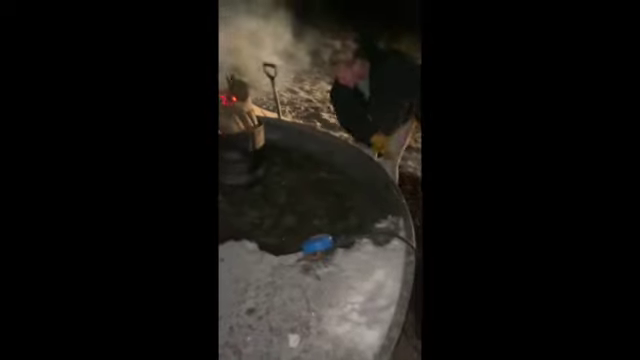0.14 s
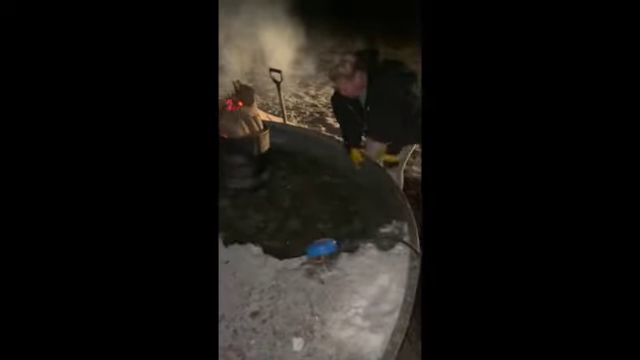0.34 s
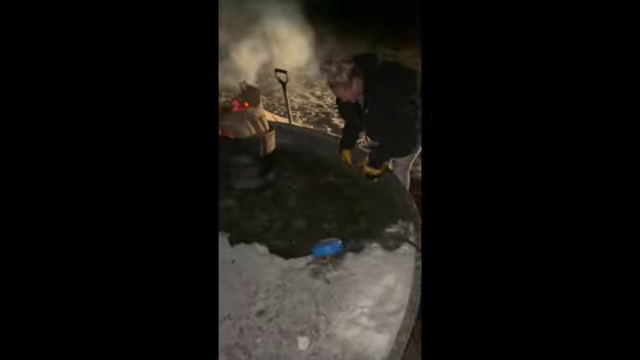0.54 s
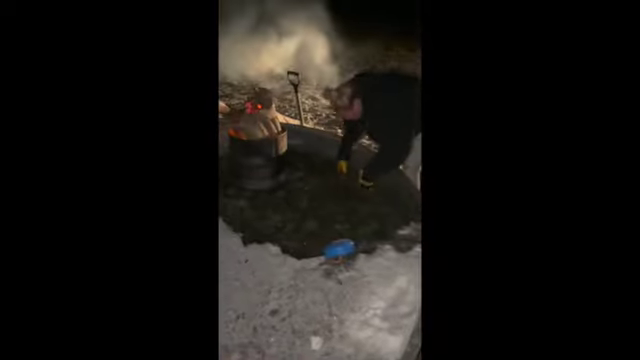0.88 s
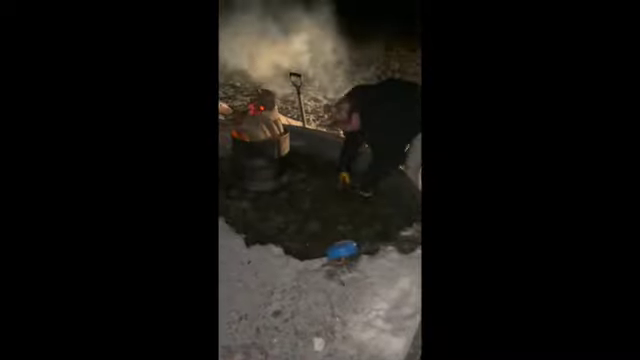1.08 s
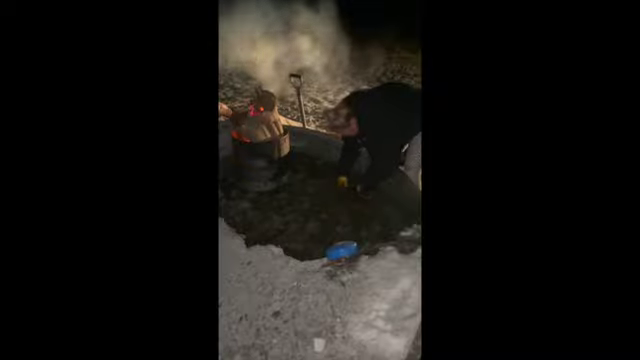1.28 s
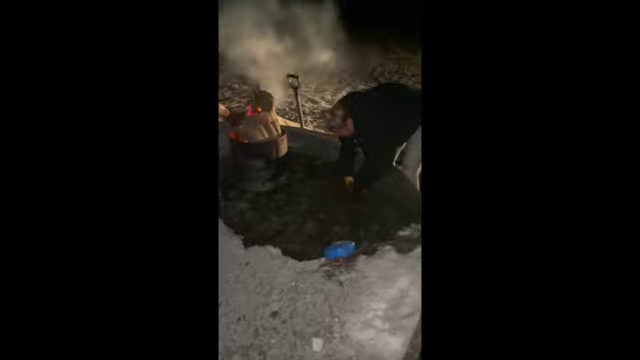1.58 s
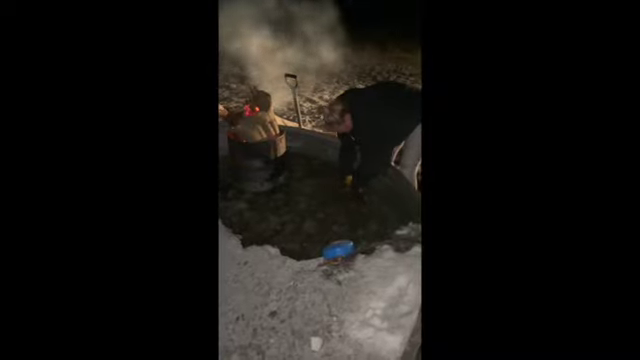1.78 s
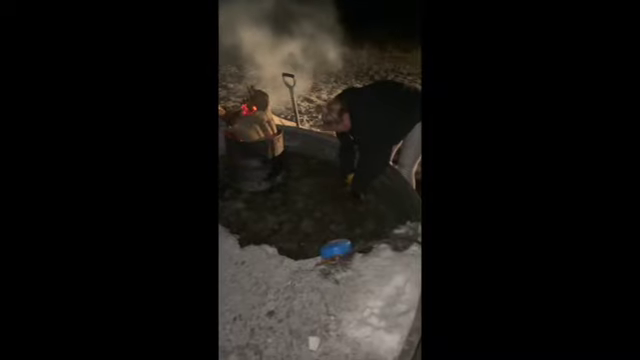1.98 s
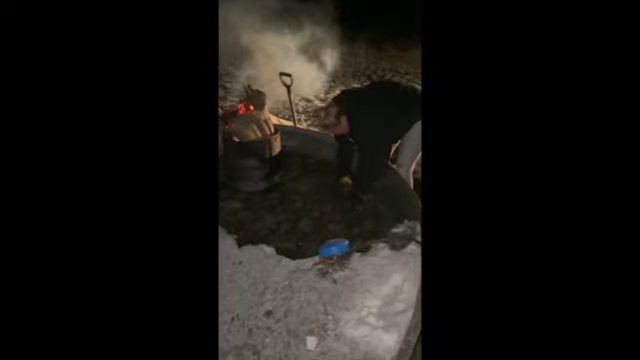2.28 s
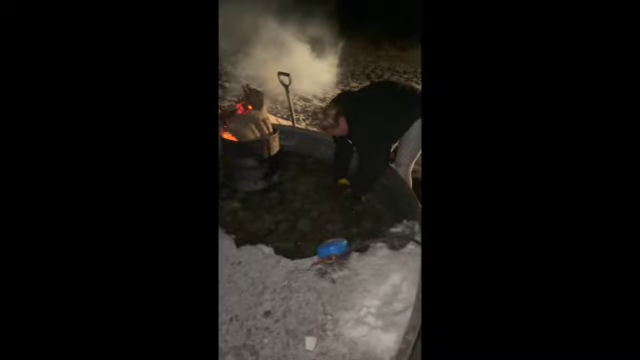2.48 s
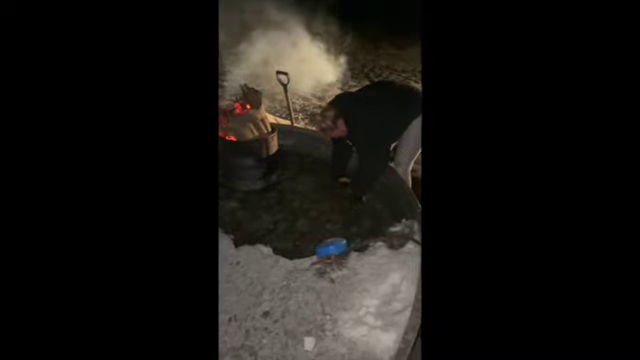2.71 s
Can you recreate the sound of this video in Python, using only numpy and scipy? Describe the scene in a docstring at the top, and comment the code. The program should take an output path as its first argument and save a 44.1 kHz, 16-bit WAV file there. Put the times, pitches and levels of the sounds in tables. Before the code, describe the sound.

Ice cracks and crunches close by from about 0.3 to 0.6 seconds, with sharp snaps and one hollow knock. From 1 second, floating chunks bump a little farther off while water sloshes, glugs and drips in the tank. The surges are strongest near 1.5 and 2 seconds, the second with another snap, and a smaller one follows at 2.5. A low outdoor rumble and faint hiss continue throughout.

```python
"""Broken ice is worked loose in a water-filled stock tank, outdoors at night.
First, close by, ice cracks and crunches in bursts of tiny fractures, with one hollow knock at 0.35 s.
From 1 s, floating chunks bump and ring farther off. The water sloshes in a few surges:
trapped air glugs, drops leave ringing bubbles. A low rumble and a faint hiss lie under it all."""
import sys
import numpy as np
from scipy import signal
from scipy.fft import rfft, irfft, next_fast_len
from scipy.io import wavfile

SR = 44100
rng = np.random.default_rng(int(sys.argv[2]) if len(sys.argv) > 2 else 0)


def transcribe(u):
    """Save the signal u as a 16-bit wav file named by the first command-line argument.

    u: samples, shape (n,) or (channels, n), limited to [-1, 1]; the rate is SR.
    q: integer samples, one column per channel.
    """
    v = np.clip(np.atleast_2d(u).T, -1, 1)
    q = np.round(v * 32767).astype(np.int16)
    wavfile.write(sys.argv[1], SR, q)


N = 125685
T = np.arange(N) / SR
FFT_SIZE = next_fast_len(N + 8192)
HZ = np.maximum(np.fft.rfftfreq(FFT_SIZE, 1 / SR), 1)

# Levels are relative gains, ahead of stereo spread and microphone.
CRACKS = [(.029, 0.0037, -71, -44, -51), (.0638, 0.0018, -65, -45, -32), (.2957, 0.0027, -28, -36, -14.5),
          (.3155, 0.0013, -33.5, -39, -14.5), (.3295, 0.0023, -47, -19, -20),
          (.3342, 0.0015, -27, -29, -15.5), (.3541, 0.0021, -19, -21.5, -16.5),
          (.365, 0.0058, -36, -29, -32), (.3765, .001, -48, -44, -33), (.3908, 0.0028, -55, -60, -24),
          (.4055, 0.0052, -34, -26, -20.5), (.4235, 0.0055, -58, -61, -26), (.4497, 0.0017, -32, -30, -39),
          (.4617, 0.0021, -30, -26, -33), (.482, .003, -58, -44, -30), (.499, 0.0039, -41, -48, -30),
          (.5248, 0.0012, -28.5, -53, -16), (.537, 0.0019, -46, -53, -33), (.576, 0.0055, -44, -44, -46.5),
          (.634, 0.01, -66, -48, -38), (.6759, 0.014, -42.5, -51, -46), (.7422, 0.0023, -60, -71, -39.5),
          (.856, 0.0046, -45, -45.5, -50), (.8709, 0.0018, -42, -40, -40), (.8969, 0.0046, -69, -62, -41),
          (.9283, .005, -72, -69, -42.5), (1.0925, 0.0013, -53, -40, -28.5),
          (1.3465, 0.0013, -35.5, -39, -37), (1.9612, 0.0009, -15, -39, -45),
          (2.155, 0.0017, -48, -41, -39.5), (2.248, 0.0016, -64, -61, -40), (2.75, 0.0042, -67, -51, -41.5)]  # close ice cracking: t/s, decay/s, bass/dB, middle/dB, treble/dB
ICE_MODES = [(2330, -49, 0.057), (2570, -36.5, 0.04), (3000, -37, 0.042), (5670, -45, 0.06),
             (12100, -28, 0.025)]  # ring of close ice: f/Hz, level/dB, t60/s
CRUNCH_ENVELOPE = [(0, -54.5), (.285, -63), (.3, -34.5), (.345, -42), (.37, -41), (.42, -41.5), (.46, -41),
                   (.52, -45), (.6, -61), (.66, -46), (.75, -87), (.87, -60), (1, -83), (2.85, -65)]  # crumbling ice: t/s, level/dB
CRUNCH_SPECTRUM = [(650, -2.5), (1100, -9), (2000, -7.5), (2800, -2), (4000, 1), (7000, -4), (10000, -23),
                   (12500, -7.5), (16000, 3.5)]  # crumbling ice: f/Hz, level/dB
CLINKS = [(0.2964, 6180, -31, 0.0025), (0.296, 6840, -22.5, .003), (0.2975, 1196, -20.5, 0.0042),
          (0.2991, 2950, -28, 0.0091), (0.33, 1560, -21, 0.0033), (0.334, 5820, -20.5, 0.0045),
          (0.333, 2440, -15.5, 0.002), (0.3913, 12400, -29, .005), (0.4057, 7850, -13.5, 0.0029),
          (0.4066, 980, -28, 0.0044), (0.405, 1607, -24, 0.004), (0.427, 2720, -38, 0.017),
          (0.4498, 2840, -19, 0.0019), (0.461, 3000, -37, 0.0053), (0.524, 7200, -27, 0.0033),
          (0.5255, 1004, -29.5, 0.0054), (.576, 958, -36, 0.0063), (.578, 3000, -47, 0.0084),
          (0.7428, 12640, -33, 0.002)]  # ringing shards: t/s, f/Hz, peak/dB, decay/s
SNAPS = [(0.061, -38), (0.3149, -9), (.3345, -15), (0.3552, -8), (0.391, -15), (.407, -15), (0.462, -16),
         (0.5248, -6.5), (0.8712, -29.5), (1.0925, -27), (1.3472, -23.5), (1.435, -25), (1.504, -32),
         (1.9615, -20)]  # brittle breaks: t/s, level/dB
SNAP_SPECTRUM = [(1500, -22), (4000, -4), (7000, 3), (12500, -2), (16000, 2)]  # brittle breaks: f/Hz, level/dB
BUMPS = [(1.0467, 0.021, -48.5, -44, -52), (1.1096, 0.019, -65, -40.5, -47), (1.2153, 0.031, -59, -46, -48),
         (1.252, 0.0046, -42.5, -46, -41), (1.3695, 0.0079, -35.5, -42, -40.5),
         (1.4348, 0.0031, -28, -27, -37), (1.4588, 0.0025, -35, -50, -37), (1.504, 0.0026, -28, -24.5, -35),
         (1.5266, 0.0047, -30, -25.5, -30), (1.5496, 0.005, -33.5, -36, -37),
         (1.6718, 0.015, -55, -39, -53), (1.7362, 0.0083, -40, -46, -64), (1.8055, 0.0041, -36.5, -54, -63),
         (1.8594, 0.0036, -50, -43, -59), (1.9377, 0.0092, -28, -30.5, -55),
         (1.9615, 0.0046, -23, -29.5, -43), (2.046, 0.0064, -42, -37, -48),
         (2.3203, 0.0031, -38.5, -37.5, -43), (2.4186, 0.0055, -39.5, -42, -57),
         (2.449, 0.0058, -36, -40.5, -46), (2.551, 0.029, -56, -45.5, -62)]  # chunks colliding: t/s, decay/s, bass/dB, middle/dB, treble/dB
CHUNK_MODES = [(335, -24.5, 0.09), (770, -40.5, 0.18), (964, -36.5, 0.12), (1253, -29.5, 0.056),
               (2230, -26, 0.0091), (3360, -40.5, 0.02)]  # ring of floating chunks: f/Hz, level/dB, t60/s

SLOSH_ENVELOPE = [(0, -77), (.93, -59), (1.02, -75), (1.08, -47), (1.17, -65), (1.24, -42.5), (1.32, -52),
                  (1.46, -38), (1.57, -37.5), (1.7, -41), (1.78, -45.5), (1.9, -40), (1.98, -40),
                  (2.08, -40), (2.2, -61), (2.32, -44.5), (2.39, -51), (2.5, -41), (2.64, -52), (2.73, -45),
                  (2.85, -71)]  # water surges: t/s, level/dB
SLOSH_SPECTRUM = [(180, 8.5), (320, 10), (480, 1), (800, -1.5), (1300, -11), (2200, -13.5), (3500, -19.5),
                  (5000, -46), (7000, -48), (15000, -30)]  # bubbles and wash: f/Hz, level/dB
SPRAY_ENVELOPE = [(0, -83), (1.0, -62.5), (1.25, -55), (1.42, -51), (1.54, -39.5), (1.66, -47.5),
                  (1.8, -61.5), (1.9, -49.5), (1.97, -46), (2.1, -51), (2.22, -55), (2.5, -54), (2.68, -52),
                  (2.85, -54)]  # droplet fizz: t/s, level/dB
SPRAY_SPECTRUM = [(1500, -35), (3300, 8), (5000, 4.5), (7000, -0.5), (10000, -18), (13000, 0.5), (16000, 6)]  # droplet fizz: f/Hz, level/dB
GLUGS = [(.297, 385, -31, 0.0043), (.3537, 720, -8, 0.0015), (.355, 894, -11.5, 0.00082),
         (.3535, 248, -17.5, 0.0014), (1.238, 335, -34, 0.0086), (1.372, 340, -23.5, 0.0079),
         (1.434, 928, -30, 0.0085), (1.465, 305, -22.5, 0.0045), (1.524, 335, -28.5, 0.0079),
         (1.558, 307, -18.5, 0.008), (1.603, 345, -35, 0.0055), (1.812, 335, -33.5, 0.0073),
         (1.9612, 280, -26, .004), (2.049, 319, -31, 0.0075), (2.498, 347, -28, 0.0042),
         (2.526, 304, -28, 0.0083), (2.712, 343, -39, 0.0052)]  # hollow ice knocks and trapped air: t/s, f/Hz, peak/dB, swell/s
THUDS = [(.205, 150, -51, 0.0086), (.45, 69.3, -33, 0.058), (.545, 79, -21.5, 0.013),
         (.68, 55, -33.5, 0.014), (.92, 51, -45, .018), (1.075, 133, -28.5, 0.0056),
         (1.465, 174, -35.5, 0.0092), (1.55, 134, -31.5, 0.017), (1.607, 165, -23.5, 0.0037),
         (1.8, 60.6, -31.5, 0.0062), (1.921, 85, -27, 0.005), (1.958, 112, -29.5, 0.016),
         (1.985, 204, -31.5, 0.0085), (2.525, 154, -35, 0.013)]  # heaving water: t/s, f/Hz, peak/dB, swell/s
WAVES = [(1.425, -44, .016), (1.524, -38, 0.043), (1.956, -32.5, 0.022), (2.03, -39, 0.0093),
         (2.299, -42, 0.012), (2.467, -38.5, 0.014), (2.53, -44, .025)]  # waves along the wall: t/s, peak/dB, swell/s
WAVE_SPECTRUM = [(220, 0.5), (400, -3), (550, -2.5), (850, 2), (1400, -11), (3000, -24), (5000, -35)]  # wave wash: f/Hz, level/dB
DRIPS = [(.112, 1830, -48, 0.0026), (.215, 1774, -51, 0.0089), (1.045, 1875, -38, 0.0027),
         (1.046, 1174, -35.5, 0.0011), (1.111, 1416, -42, 0.0052), (1.214, 1270, -43.5, 0.0068),
         (1.372, 765, -31.5, .005), (1.434, 3520, -33, 0.0014), (1.469, 3350, -33.5, 0.0012),
         (1.502, 1900, -33, 0.0041), (1.591, 3380, -39, 0.002), (1.597, 2270, -37, 0.002),
         (1.671, 3660, -39, .0015), (1.733, 2270, -36.5, 0.0022), (1.806, 795, -47, 0.0021),
         (1.808, 460, -35, 0.0047), (1.9605, 1300, -21, 0.0018), (1.9605, 1790, -28, 0.0018),
         (2.045, 2310, -40, 0.0033), (2.172, 2750, -46, 0.0033), (2.318, 2110, -40.5, 0.0022),
         (2.365, 1270, -40.5, 0.0029), (2.417, 1464, -45, 0.0053), (2.474, 830, -40, 0.0049),
         (2.502, 500, -32, 0.0035), (2.645, 3550, -44, .002), (2.67, 3400, -43, 0.0017),
         (2.702, 1990, -47, 0.0036)]  # single drips: t/s, f/Hz, peak/dB, swell/s
TRICKLE_ENVELOPE = [(0, -62), (.3, -62), (.7, -80), (1.0, -60), (1.3, -57), (1.6, -49), (1.8, -55.5),
                    (2.05, -54.5), (2.25, -53), (2.6, -52), (2.85, -55)]  # run-off from the ice: t/s, level/dB
DROP_SPECTRUM = [(900, -0.5), (2000, 12), (3300, 12), (4500, 3), (7000, -30)]  # run-off drop strength by pitch: f/Hz, level/dB

RUMBLE_ENVELOPE = [(0, -41.5), (.25, -38.5), (.55, -38.5), (.75, -40.5), (1.3, -37.5), (1.75, -40.5),
                   (1.98, -33), (2.2, -41.5), (2.55, -37.5), (2.85, -40.5)]  # outdoor rumble: t/s, level/dB
RUMBLE_SPECTRUM = [(25, -19), (45, -7), (70, -4.5), (125, 1), (170, -6), (240, -9.5), (310, -12.5),
                   (420, -29.5), (700, -28)]  # outdoor rumble: f/Hz, level/dB
HISS_ENVELOPE = [(0, -59), (.2, -57.5), (.6, -55.5), (.76, -57), (.97, -56.5), (1.3, -53), (2.2, -55),
                 (2.85, -56.5)]  # faint hiss: t/s, level/dB
HISS_SPECTRUM = [(400, -6), (1000, 5), (2000, -4), (3200, -8.5), (5000, -9.5), (6500, -8), (8000, -8),
                 (10000, -33), (12500, -11), (16000, -21)]  # faint hiss: f/Hz, level/dB

STEREO_WIDTH = [(60, -46), (140, -26), (270, -14.5), (500, -7), (1200, -13), (2500, -5), (6000, -3),
                (9000, -22), (11000, -15.5), (15000, -6)]  # side against mid: f/Hz, level/dB
PORT_BALANCE = [(200, -0.5), (350, -2.5), (700, 2.5), (1250, 0.5), (2300, -6.5), (2900, 3.5), (3700, -4),
                (5300, 0.5), (6500, -0.5)]  # microphone ports, left minus right: f/Hz, level/dB
PORT_PHASE = [(200, 0), (750, -0.9), (1500, -0.47), (2600, 0.81), (3300, 0.33), (4000, 0.5), (5600, 0),
              (7400, 1.57), (8500, 2.5), (11500, 3.5), (13900, 6.5), (16500, 3)]  # lead of the left port: f/Hz, phase/rad
MIC_RESPONSE = [(100, -0.5), (3300, -2), (4700, -7), (5500, -1.5), (7300, -3), (9300, 1), (10500, 0),
                (12300, 2), (16000, -11)]  # microphone colour: f/Hz, level/dB


def cracks():
    """Close ice fractures: sharp attack, bright ring."""
    return contacts(CRACKS, ICE_MODES, edges_hz=[850, 1500, 4000, 15000], decay_scales=[1.34, 1, 0.93],
                    rise_s=0.0001, tail_db=-27, tail_s=0.011, direct_db=0, grit_db=5.5)


def crunch(t60_cycles=6, splinter_db=-4.5):
    """Crumbling ice: dense clicks plus briefly ringing splinters."""
    crumbs = stereo(colour(grains(per_s=3500, spread_db=6), CRUNCH_SPECTRUM))
    clicks = grains(per_s=1500, spread_db=3.5)
    rings = scatter_rings(clicks, np.geomspace(1100, 7500, 24), t60_cycles)
    splinters = stereo(rms_one(sum(tone for _, tone in rings)))
    return level(CRUNCH_ENVELOPE) * (crumbs + from_db(splinter_db) * splinters)


def snaps(decay_s=0.001):
    """Ice gives way at once: short, bright noise ticks."""
    bursts = sum(from_db(db) * (T >= s) * np.exp(-np.maximum(T - s, 0) / decay_s) for s, db in SNAPS)
    return stereo(bursts * noise(SNAP_SPECTRUM) / 2)


def clinks():
    """Shards ring as they snap: one damped sine each."""
    out = np.zeros(N)
    for start_s, hz, db, decay_s in CLINKS:
        t = np.maximum(T - start_s, 0)
        out += from_db(db) * np.exp(-t / decay_s) * np.sin(2 * np.pi * hz * t)
    return out


def floating_chunks():
    """Chunks collide in the tank: softer attack, lower and longer ring."""
    return contacts(BUMPS, CHUNK_MODES, edges_hz=[380, 1250, 4000, 15500], decay_scales=[1.25, 1, 1],
                    rise_s=0.00031, tail_db=-22, tail_s=0.02, direct_db=-1, grit_db=2.5)


def contacts(rows, modes, edges_hz, decay_scales, rise_s, tail_db, tail_s, direct_db, grit_db):
    """Bursts of tiny fractures in three bands, with a weak scattered tail, ring the ice modes."""
    forces = np.zeros((3, N))
    scales = np.array(decay_scales)[:, None]
    for start_s, decay_s, *band_db in rows:
        t = np.maximum(T - start_s, 0)
        attack = 1 - np.exp(-t / rise_s)
        body = np.exp(-t / (decay_s * scales)) / np.sqrt(scales)
        tail = from_db(tail_db) * np.exp(-t / tail_s)
        forces += from_db(band_db)[:, None] * attack * (body + tail)
    direct = np.zeros((2, N))
    for force, low_hz, high_hz in zip(forces, edges_hz, edges_hz[1:]):
        band = signal.butter(2, [low_hz, high_hz], "band", fs=SR, output="sos")
        fractures = rms_one(rng.standard_normal((2, N)) * from_db(grit_db * rng.standard_normal(N)))
        makeup_gain = np.sqrt(SR / 2 / (high_hz - low_hz))
        direct += makeup_gain * signal.sosfilt(band, force * fractures)
    ringing = sum(from_db(db) * ring(direct, hz, t60_s) for hz, db, t60_s in modes)
    return stereo(from_db(direct_db) * direct + ringing / 2)


def glugs():
    """Hollow ice knocks and glugs of trapped air: slightly rising tones."""
    return pan(pulses(GLUGS, rise_per_s=0.76), left_db=-1)


def slosh(t60_cycles=16, bubble_db=-2, wash_db=-1.5):
    """Surging water: ringing bubbles in a wash of clicks."""
    clicks = grains(per_s=590, spread_db=2.5)
    rings = scatter_rings(clicks, np.geomspace(280, 4500, 30), t60_cycles)
    bubbles = rms_one(sum(tone * hz * from_db(at_hz(SLOSH_SPECTRUM, hz)) for hz, tone in rings))
    wash = colour(grains(per_s=5000, spread_db=3.5), SLOSH_SPECTRUM)
    surge = level(SLOSH_ENVELOPE) * spurts(per_s=180, depth_db=0.5)
    return surge * (from_db(bubble_db) * bubbles + from_db(wash_db) * wash)


def spray():
    """Droplets fizz: dense bright clicks in spurts."""
    envelope = level(SPRAY_ENVELOPE) * spurts(per_s=220, depth_db=5.5)
    return envelope * colour(grains(per_s=5100, spread_db=5), SPRAY_SPECTRUM)


def spurts(per_s, depth_db):
    """Water arrives unevenly: random gain, rms 1."""
    knots_s = np.cumsum(rng.exponential(1 / per_s, 2000))
    return rms_one(from_db(depth_db * np.interp(T, knots_s, rng.standard_normal(len(knots_s)))))


def tank(x, t60_s=0.12, delay_s=0.004, lowpass_hz=2460, echo_db=-5.5):
    """Dense wall reflections add a short, dull tail."""
    echoes = rng.standard_normal((2, N)) * from_db(-60 * T / t60_s) * (T > delay_s)
    echoes /= np.sqrt(np.sum(echoes ** 2) / 2)
    response = rfft(echoes, FFT_SIZE) / (1 + 1j * HZ / lowpass_hz)
    return x + from_db(echo_db) * shape(x, response)


def thuds():
    """Heaving water: low pulses of steady pitch."""
    return pulses(THUDS, rise_per_s=0)


def waves():
    """Waves swell fast and run out along the wall as smooth noise."""
    flow = sum(swell(np.maximum(T - start_s, 0), db, swell_s) for start_s, db, swell_s in WAVES)
    return stereo(flow * noise(WAVE_SPECTRUM))


def drips():
    """Single drips: short, slightly rising plips."""
    return pulses(DRIPS, rise_per_s=2)


def trickle(drops_per_s=750, t60_cycles=47, spread_db=2.8):
    """Run-off drops fall at random; each leaves a bubble that rings and rises in pitch."""
    out = np.zeros((2, N + SR))
    t = np.arange(SR // 20) / SR
    low_hz, high_hz = DROP_SPECTRUM[0][0], DROP_SPECTRUM[-1][0]
    for when, pitch, size, place in rng.random((int(drops_per_s * N / SR), 4)):
        start = int(when * N)
        hz = low_hz * (high_hz / low_hz) ** pitch
        db = at_hz(DROP_SPECTRUM, hz) - spread_db * np.log(max(size, 0.03))
        drop = from_db(db - 60 * t * hz / t60_cycles) * chirp(t, hz, rise_per_s=2)
        out[:, start:start + len(t)] += pan(drop, left_db=10 * place)
    return level(TRICKLE_ENVELOPE) * rms_one(out[:, :N])


def background():
    """Low outdoor rumble and faint hiss."""
    rumble = level(RUMBLE_ENVELOPE) * noise(RUMBLE_SPECTRUM)
    hiss = level(HISS_ENVELOPE) * noise(HISS_SPECTRUM)
    return stereo(rumble + hiss)


def grains(per_s, spread_db):
    """Two streams of random clicks of uneven size."""
    sizes = from_db(spread_db * np.minimum(rng.exponential(1, (2, N)), 4))
    return sizes * rng.choice([-1, 1], (2, N)) * (rng.random((2, N)) < per_s / SR)


def scatter_rings(clicks, pitches_hz, t60_cycles):
    """Each click rings one random resonator; returns (f/Hz, signal) pairs."""
    choice = rng.integers(0, len(pitches_hz), N)
    return [(hz, ring(clicks * (choice == k), hz, t60_cycles / hz)) for k, hz in enumerate(pitches_hz)]


def ring(x, hz, t60_s):
    """Two-pole resonator: a unit click starts a decaying unit sine."""
    radius, step_rad = from_db(-60 / (t60_s * SR)), 2 * np.pi * hz / SR
    return signal.lfilter([0, np.sin(step_rad)], [1, -2 * radius * np.cos(step_rad), radius ** 2],
                          x + 1e-18)


def pulses(rows, rise_per_s):
    """Tones that swell and die."""
    out = np.zeros(N)
    for start_s, hz, db, swell_s in rows:
        t = np.maximum(T - start_s, 0)
        out += swell(t, db, swell_s) * chirp(t, hz, rise_per_s)
    return out


def swell(t, peak_db, swell_s):
    """Envelope peaking at swell_s."""
    return from_db(peak_db) * t / swell_s * np.exp(1 - t / swell_s)


def chirp(t, hz, rise_per_s):
    """Sine of frequency hz * (1 + rise_per_s * t)."""
    return np.sin(2 * np.pi * hz * t * (1 + rise_per_s * t / 2))


def noise(spectrum):
    """Two streams of coloured noise."""
    return colour(rng.standard_normal((2, N)), spectrum)


def colour(x, spectrum):
    """Impose a spectrum, rolled off beyond its ends; rms 1."""
    low_hz, high_hz = spectrum[0][0], spectrum[-1][0]
    rolloff = 1 / np.sqrt((1 + (low_hz / HZ) ** 6) * (1 + (HZ / high_hz) ** 6))
    return rms_one(shape(x, from_db(at_hz(spectrum, HZ)) * rolloff))


def shape(x, response):
    """Apply a frequency response."""
    return irfft(rfft(x, FFT_SIZE) * response, FFT_SIZE)[..., :N]


def stereo(pair):
    """Mid and side to left and right; bass stays central."""
    side = shape(pair[1], from_db(at_hz(STEREO_WIDTH, HZ)))
    return np.array([pair[0] + side, pair[0] - side])


def pan(x, left_db):
    """Place by left-right level difference."""
    return x * from_db([[left_db / 2], [-left_db / 2]])


def level(envelope):
    """Gain over time from t/s, level/dB rows."""
    return from_db(np.interp(T, *np.transpose(envelope)))


def at_hz(rows, hz):
    """Interpolate a table over log frequency."""
    knots_hz, values = np.transpose(rows)
    return np.interp(np.log(hz), np.log(knots_hz), values)


def from_db(db):
    """Decibels to gain."""
    return 10 ** (np.asarray(db) / 20)


def rms_one(x):
    """Scale to unit rms."""
    return x / np.sqrt(np.mean(x ** 2) + 1e-20)


def scene():
    """Ice, water and the air around the tank."""
    ice = crunch() + cracks() + clinks() + floating_chunks()
    water = tank(slosh() + spray())
    surges = stereo(water) + glugs() + thuds() + waves()
    return ice + surges + drips() + background() + trickle() + snaps()


def record(dry, cutoff_hz=15900):
    """Two microphone ports colour the treble and differ in level and phase; steep low-pass."""
    left_gain = from_db(at_hz(PORT_BALANCE, HZ) / 2)
    ports = np.array([left_gain, np.exp(-1j * at_hz(PORT_PHASE, HZ)) / left_gain])
    heard = shape(dry, ports * from_db(at_hz(MIC_RESPONSE, HZ)))
    lowpass = signal.ellip(10, 0.2, 80, cutoff_hz, fs=SR, output="sos")
    return signal.sosfilt(lowpass, heard)


dry = scene()
out = record(dry)
transcribe(out)
```